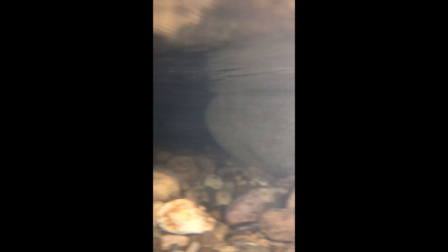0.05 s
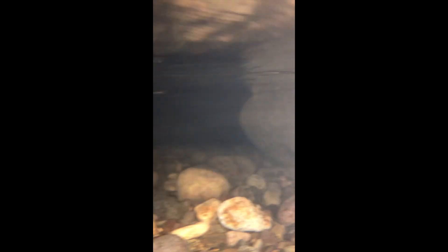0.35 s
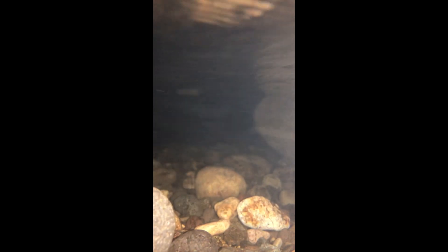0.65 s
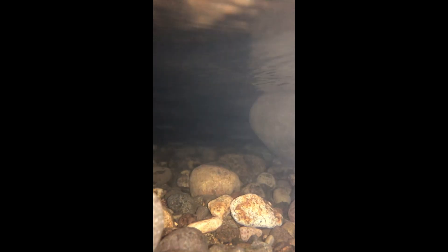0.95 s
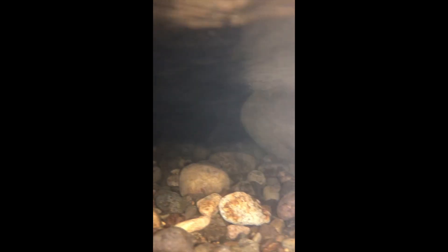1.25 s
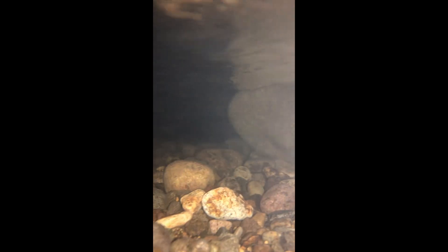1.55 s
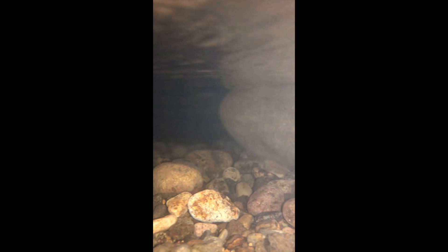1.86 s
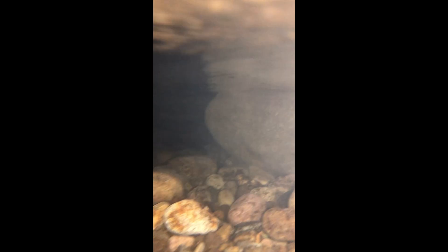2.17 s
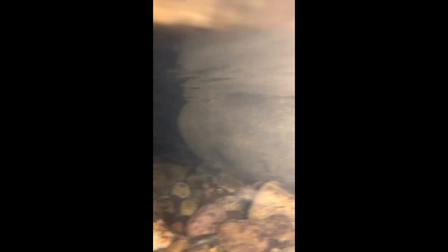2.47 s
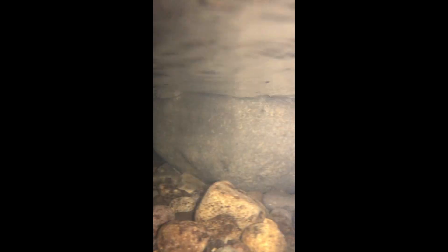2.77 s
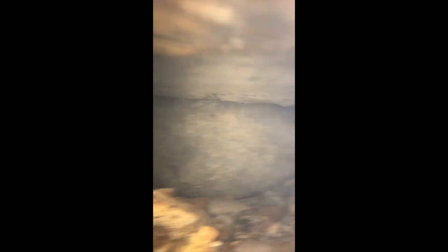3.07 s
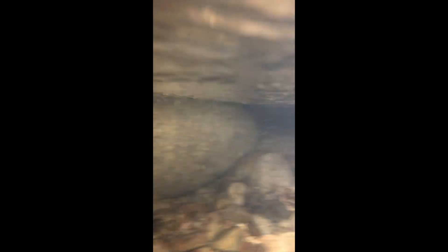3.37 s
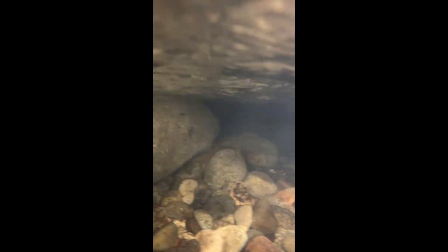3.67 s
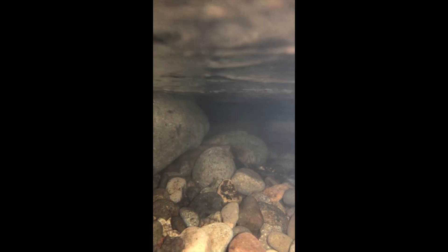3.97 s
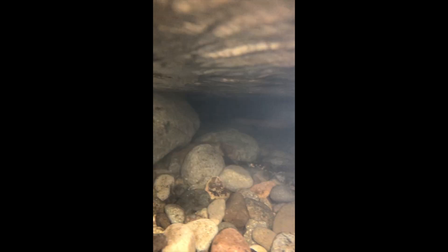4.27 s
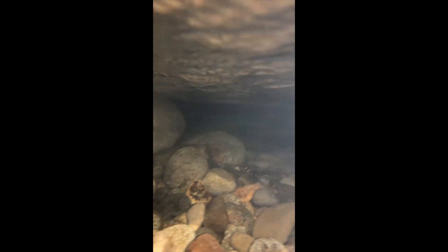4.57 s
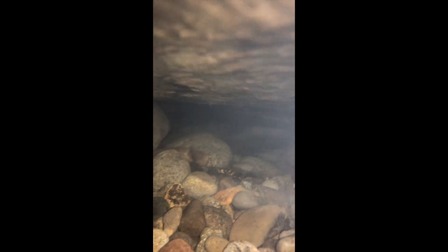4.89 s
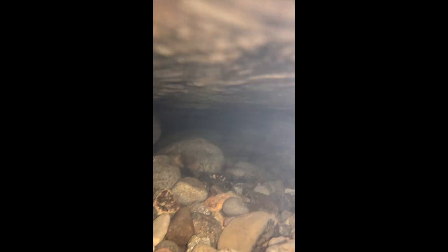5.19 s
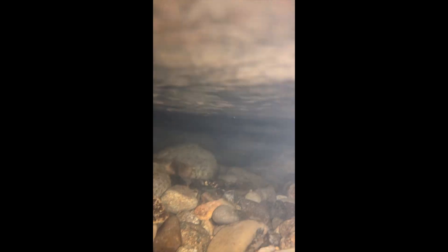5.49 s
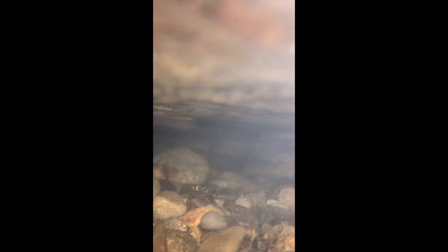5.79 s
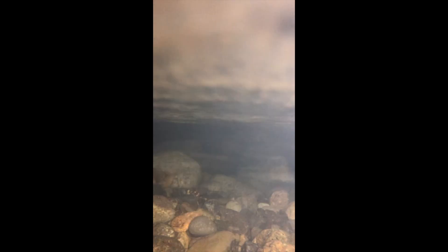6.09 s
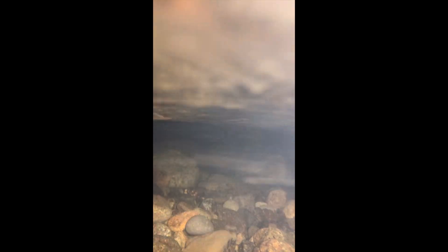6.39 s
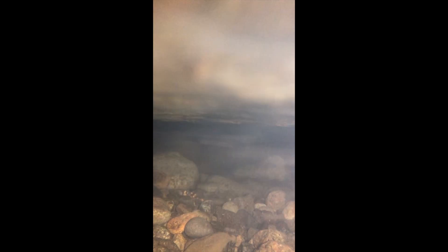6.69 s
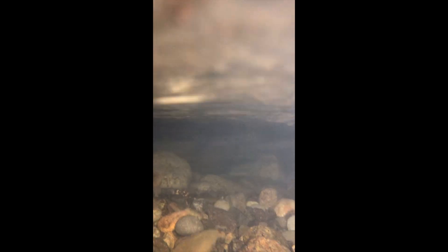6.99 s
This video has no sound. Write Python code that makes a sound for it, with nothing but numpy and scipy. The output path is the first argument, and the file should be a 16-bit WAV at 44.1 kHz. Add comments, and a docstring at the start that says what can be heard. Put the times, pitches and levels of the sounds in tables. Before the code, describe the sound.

Muffled underwater rumble of a shallow stony river, with chirping knocks on the microphone, a few close bubble pings and low buffeting near the end.

```python
"""Chirping knocks and a few close bubble pings, over the rumble of a shallow stony river heard underwater.
The ear is a hand-held waterproof camera: knocks on its case arrive treble first, as short falling chirps.
Countless far bubbles blur into a muffled wash, sand ticks on the case and the water round it rings hollow.
Towards the end eddies buffet the case, a low drone joins the rumble and two short sloshes gurgle past."""
import sys
import numpy as np
from scipy import signal
from scipy.fft import rfft, irfft
from scipy.io import wavfile

SR = 44100
rng = np.random.default_rng(int(sys.argv[2]) if len(sys.argv) > 2 else 0)


def wrap_up_sound(samples):
    """Save the sound to the file named by the first command line argument, as 16-bit audio."""
    columns = np.atleast_2d(samples).T
    # keep every value between -1 and 1, then stretch to whole-number steps
    tamed = np.clip(columns, -1, 1)
    steps = np.round(tamed * 32767).astype(np.int16)
    wavfile.write(sys.argv[1], SR, steps)


N = 319725

# strength of the current along the case: time_s, level_db
CURRENT_LEVEL = [(0, -40), (0.22, -47.5), (0.48, -57.5), (0.72, -46), (0.9, -54), (1.2, -42.5), (1.7, -47),
                 (2.2, -44.5), (2.6, -47), (3.0, -39), (3.25, -47), (4.5, -46), (5.2, -47.5), (5.6, -42),
                 (5.85, -46.5), (6.4, -46.5), (7.0, -43), (7.25, -42.5)]
# bass-heavy tone of the turbulence: frequency_hz, gain_db
RUMBLE_EQ = [(22, -49), (35, -11.5), (55, 1.5), (85, 5), (120, 0.5), (170, -5.5), (240, -17), (400, -21),
             (800, -49.5), (3000, -100)]
# faders for the riffle's bubbles and sand: time_s, wash_db, fizz_db
RIFFLE_LEVELS = [(0, -51.5, -71), (0.25, -52, -70.5), (0.45, -54, -72), (0.8, -51, -72.5), (1.9, -51, -74),
                 (2.4, -53, -70.5), (2.8, -51.5, -73.5), (3.2, -52.5, -71), (3.7, -53.5, -72.5),
                 (4.6, -53, -74.5), (5.5, -53, -73), (6.05, -52, -75), (6.42, -52, -70.5),
                 (6.65, -52, -74.5), (7.25, -51.5, -72.5)]
# muffled tone of the far bubbles: frequency_hz, gain_db
WASH_EQ = [(60, -17.5), (200, 0), (320, -1.5), (520, -0.5), (760, -3.5), (1050, -1), (1350, -7.5),
           (1650, -9.5), (2050, -7.5), (2400, -11.5), (2800, -26.5), (3600, -32.5), (6000, -53),
           (12000, -72)]
# hollow ring of the water round the case, strong at first: time_s, level_db
RING_LEVEL = [(0, -45), (0.2, -47.5), (0.4, -55.5), (1.0, -58), (2.6, -58), (4.8, -55), (7.25, -66.5)]
# bright tone of the sand: frequency_hz, gain_db
FIZZ_EQ = [(1500, -27.5), (2800, -1.5), (3800, -1), (4600, -7.5), (5200, -10), (6000, -16), (7500, -21),
           (12000, -54)]
# knocks on the case: time_s, peak_db, low_edge_hz, top_edge_hz
CASE_KNOCKS = [(0.118, -14, 510, 2570), (0.1269, -15.5, 415, 1590), (0.2272, -17, 535, 3100),
               (0.2393, -24, 500, 2000), (0.2729, -33, 605, 2220), (0.322, -20.5, 614, 2200),
               (0.3447, -22.5, 503, 3270), (0.3489, -17.5, 516, 2370), (0.6613, -35, 560, 1510),
               (0.7678, -37.5, 420, 614), (0.9856, -26.5, 318, 1090), (1.127, -25.5, 80, 540),
               (1.154, -22, 51, 734), (1.1823, -29, 51, 400), (2.072, -26, 69.4, 640),
               (2.1744, -27.5, 96, 600), (2.2699, -34.5, 51, 1400), (2.3632, -39.5, 51, 920),
               (2.526, -34.5, 420, 635), (2.9142, -37, 97, 680), (2.9863, -30, 178, 650),
               (3.0361, -30.5, 322, 680), (3.061, -31.5, 80, 545), (3.467, -16, 79, 420),
               (3.9784, -22, 61.4, 536), (4.199, -23.5, 68.4, 406), (4.4924, -37, 51, 646),
               (4.6843, -39, 750, 1400), (4.9802, -28.5, 119, 584), (5.316, -33.5, 51, 700),
               (5.3912, -26.5, 68, 745), (5.721, -30.5, 100, 720), (5.7564, -23, 68, 613),
               (5.7754, -23.5, 100, 594), (6.019, -36.5, 250, 700), (6.972, -28.5, 117, 840)]
# bubbles close by: pinch_off_s, peak_db, pitch_hz, swell_s, decay_s
NEAR_BUBBLES = [(0.1275, -22, 1114, 0.0007, 0.0038), (0.131, -24, 503, 0.0011, 0.0041),
                (.231, -28.5, 630, 0.00038, .005), (.2445, -19, 820, 0.00085, 0.00022),
                (.247, -5.5, 1507, 0.000076, 0.0032), (0.2725, -26, 1470, 0.00009, 0.0019),
                (0.311, -37, 2544, .003, 0.0096), (0.3184, -31, 2840, .0007, .0011),
                (0.3211, -6, 2130, 0.00037, 0.0017), (0.99, -27.5, 476, 0.0024, 0.0052)]
# single hard shoves of water: centre_s, peak_db, pitch_hz, half_length_s
WATER_SURGES = [(1.014, -34, 60, 0.01), (1.188, -29.5, 83, 0.018), (5.437, -27.5, 55, 0.013),
                (6.053, -24, 119, 0.0076), (6.068, -13, 76, .012), (6.246, -29.5, 75, 0.0078),
                (6.654, -22.5, 97, 0.0078), (6.705, -17, 87, 0.0055), (6.749, -22.5, 85, 0.0072),
                (6.793, -13, 68.4, 0.007)]
# low drone that joins the rumble: time_s, level_db
DRONE_LEVEL = [(0, -74), (5.1, -70.5), (5.5, -55), (6.3, -55), (6.7, -43.5), (7.25, -55)]
# spells of buffeting that swell and die away: centre_s, level_db, pitch_hz, half_length_s
BUFFET_SPELLS = [(5.46, -34, 55, .055), (6.046, -35, 72, 0.089), (6.757, -31.5, 62, 0.14),
                 (7.2, -37.5, 60, 0.085)]
# sloshes against the case: crest_s, level_db, rise_s
SLOSH_SWELLS = [(6.575, -45, 0.056), (7.01, -56, .02)]
# throaty tone of the sloshes: frequency_hz, gain_db
SLOSH_EQ = [(100, -20), (330, 0), (650, -2.5), (1100, -10), (2200, -17), (5000, -59), (12000, -86)]
# thin whine of the electronics: pitch_hz, width_hz, base_level_db
WHINE_TONES = [(4960, 80, -81.5), (9950, 80, -98), (14928, 95, -101.5)]
# fader ride on that whine: time_s, gain_db
WHINE_RIDE = [(0, -3), (3.2, 0.5), (4.6, -3), (5.3, 1.5), (6.45, 2.5), (6.65, -1.5), (7.25, 3)]
# tone of the electronic hiss: frequency_hz, gain_db
HISS_EQ = [(500, 0.5), (6000, -5.5), (9000, 2), (12500, -0.5), (15000, -6)]

CASE_HZ, CASE_Q = 74.6, 1.09  # the case sways on the water round it
KNOCK_LEAD_S = .01  # room ahead of each chirp's attack


def gain_of(db):
    """Decibels to amplitude."""
    return 10 ** (np.asarray(db) / 20)


def unit_rms(x):
    """Scales to an rms of one."""
    return x / np.sqrt(np.mean(x ** 2) + 1e-30)


def fader(rows, column=1):
    """One dB column of a level table as a gain for every sample."""
    rows = np.asarray(rows)
    return gain_of(np.interp(np.arange(N) / SR, rows[:, 0], rows[:, column]))


def swell(crest_s, db, rise_s, fall_s):
    """A bell-shaped fade in and out, as a gain for every sample."""
    t = np.arange(N) / SR - crest_s
    return gain_of(db) * np.exp(-.5 * (t / np.where(t < 0, rise_s, fall_s)) ** 2)


def add(mix, start_s, sound):
    """Drops a sound into the mix."""
    part = mix[max(round(start_s * SR), 0):][:len(sound)]
    part += sound[:len(part)]


def equalised(x, eq):
    """Runs x through an EQ curve, to an rms of one."""
    hz, db = np.transpose(eq)
    f = np.fft.rfftfreq(N, 1 / SR)
    curve = gain_of(np.interp(np.log(f + 1), np.log(hz), db))
    return unit_rms(irfft(rfft(x) * curve, N))


def drift(rate_hz):
    """A slow random wobble with an rms of one."""
    f = np.fft.rfftfreq(N, 1 / SR)
    return unit_rms(irfft(rfft(rng.standard_normal(N)) * np.exp(-(f / rate_hz) ** 2), N))


def resonance(hz, width_hz):
    """Noise ringing in one narrow band, whose pitch may move."""
    f = np.fft.fftfreq(N, 1 / SR)
    noise = rng.standard_normal(N) + 1j * rng.standard_normal(N)
    envelope = np.fft.ifft(noise / (1 + (f / width_hz) ** 2))
    carrier = np.exp(2j * np.pi * np.cumsum(hz * np.ones(N)) / SR)
    return unit_rms((envelope * carrier).real)


def clicks(per_s, spread_db):
    """A random crackle of impulses, a few of them loud."""
    size = gain_of(spread_db * np.minimum(rng.exponential(1, N), 4))
    return size * rng.choice([-1, 1], N) * (rng.random(N) < per_s / SR)


def current_rumble(trim_db=-2, lumpy_db=2.5):
    """Turbulence along the case lays down a lumpy low bed."""
    lumps = gain_of(trim_db + lumpy_db * drift(rate_hz=9))
    return lumps * fader(CURRENT_LEVEL) * equalised(rng.standard_normal(N), RUMBLE_EQ)


def bubble_wash(trim_db=1, grain=0.65, decay_cycles=5, flutter_db=0.48):
    """Countless far bubbles ping in the riffle and blur into noise, muffled by the case."""
    t, pings = np.arange(0, .05, 1 / SR), np.zeros(N)
    for hz in np.geomspace(250, 3000, 20):
        ping = np.exp(-t * hz / decay_cycles) * np.sin(2 * np.pi * hz * t * (1 + 2 * t))
        swarm = signal.oaconvolve(clicks(per_s=110, spread_db=2.6), ping)[:N]
        pings += np.sqrt(hz) * unit_rms(swarm)
    blend = grain * equalised(pings, WASH_EQ) + equalised(rng.standard_normal(N), WASH_EQ)
    flutter = gain_of(trim_db + flutter_db * drift(rate_hz=5.3))
    return flutter * fader(RIFFLE_LEVELS) * unit_rms(blend)


def hollow_ring(pitch_hz=1034, wander_hz=22, waver_db=0.5):
    """The flow keeps the water round the case ringing on a wandering midrange note."""
    ring = resonance(pitch_hz + wander_hz * drift(rate_hz=1.5), width_hz=113)
    return gain_of(waver_db * drift(rate_hz=7)) * fader(RING_LEVEL) * ring


def sand_fizz(trim_db=1, grain=.6, flutter_db=.6, spurt_mix=0.77, spurt_decay_s=0.0055):
    """Sand grains tick faintly against the case, some in small spurts."""
    tail = np.exp(-np.arange(0, .03, 1 / SR) / spurt_decay_s)
    bursts = signal.oaconvolve(abs(clicks(per_s=41, spread_db=0.9)), tail)[:N]
    spurts = spurt_mix * unit_rms(bursts * rng.standard_normal(N))
    ticks = grain * unit_rms(clicks(per_s=610, spread_db=6.0))
    blend = ticks + spurts + rng.standard_normal(N)
    flutter = gain_of(trim_db + flutter_db * drift(rate_hz=40))
    return flutter * fader(RIFFLE_LEVELS, column=2) * equalised(blend, FIZZ_EQ)


def chirp(low_hz, top_hz, lag_cycles=1.196, tilt=0.98, thump=0.088, size=4096):
    """A dispersed knock: each frequency lands about a cycle late; the case's sway delays the bass more."""
    f = np.fft.rfftfreq(size, 1 / SR) + 1e-3
    body = 1 / np.sqrt(1 + (low_hz / f) ** 6)
    push = thump / np.sqrt(1 + (CASE_HZ / f) ** 6)  # even a hard click nudges the whole case
    tone = (body + push) / f ** tilt * np.exp(-(f / top_hz) ** 5)
    lag_turns = lag_cycles * np.log((f + 3) / (f + 5000)) + f * KNOCK_LEAD_S
    sway = np.exp(-2j * np.arctan2(f * CASE_HZ / CASE_Q, CASE_HZ ** 2 - f ** 2))
    wave = irfft(tone * sway * np.exp(-2j * np.pi * lag_turns))
    peak = abs(signal.hilbert(wave)).max()
    return wave * signal.windows.tukey(size, .15) / peak


def patter(trim_db=-10):
    """Slight, dull bumps on the case, louder when the current is strong."""
    bumps = np.zeros(N)
    for top_hz in (280, 420, 650):
        bumps += signal.oaconvolve(clicks(per_s=14, spread_db=2.0), chirp(top_hz / 4, top_hz))[:N]
    return gain_of(trim_db) * fader(CURRENT_LEVEL) * unit_rms(bumps)


def knocks():
    """Single hits on the case: hard ones click, soft ones plop."""
    out = np.zeros(N)
    for time_s, db, low_hz, top_hz in CASE_KNOCKS:
        add(out, time_s - KNOCK_LEAD_S, gain_of(db) * chirp(low_hz, top_hz))
    return out


def near_bubbles(glide=0.015, tick_hz=8700, tick_db=-27.5, tick_width_s=0.000245, snap_s=.00009,
                 coder_hiss_db=-66, coder_hiss_decay_s=0.03):
    """Each bubble swells, pinches off with a tick and rings down, its pitch creeping sharp."""
    out, lead_s = np.zeros(N), .02
    t = np.arange(-lead_s, 2 * lead_s, 1 / SR)
    for pinch_off_s, db, hz, swell_s, decay_s in NEAR_BUBBLES:
        envelope = np.exp(-np.where(t < 0, -t / swell_s, t / decay_s))
        ping = envelope * np.sin(2 * np.pi * hz * t * (1 + glide * t / lead_s))
        tick = np.exp(-(t / tick_width_s) ** 2) * np.sin(2 * np.pi * tick_hz * t)
        tick_gain = gain_of(tick_db) * np.exp(-swell_s / snap_s)  # slow swellers barely tick
        add(out, pinch_off_s - lead_s, gain_of(db) * (ping + tick_gain * tick))
        # a faint, brief hiss like audio-coder noise follows each ping
        hiss = np.exp(-(t + lead_s) / coder_hiss_decay_s) * rng.standard_normal(len(t))
        add(out, pinch_off_s, gain_of(db + coder_hiss_db) * hiss)
    return out


def surges():
    """Low thuds: eddies shove the case to and fro for a cycle or two."""
    out, lead_s = np.zeros(N), .07
    t = np.arange(-lead_s, lead_s, 1 / SR)
    for centre_s, db, hz, half_s in WATER_SURGES:
        thud = np.exp(-.5 * (t / half_s) ** 2) * np.cos(2 * np.pi * hz * t)
        add(out, centre_s - lead_s, gain_of(db) * thud)
    return out


def low_drone():
    """The flow keeps a narrow bass resonance humming; it comes up late in the scene."""
    return fader(DRONE_LEVEL) * resonance(hz=148, width_hz=9.8)


def buffets(low_cut_hz=36, lumpy_db=2.5):
    """Runs of smaller eddies shake the case in lumps for a while."""
    lumps = gain_of(lumpy_db * drift(rate_hz=20))
    shake = sum(swell(centre_s, db, half_s, half_s) * resonance(hz, width_hz=26)
                for centre_s, db, hz, half_s in BUFFET_SPELLS)
    low_cut = signal.butter(5, low_cut_hz, "high", fs=SR, output="sos")
    return signal.sosfilt(low_cut, lumps * shake + 1e-12)


def sloshes():
    """Water builds against the case and breaks off: a short gurgle of tightly packed bumps."""
    envelope = sum(swell(crest_s, db, rise_s, fall_s=0.013) for crest_s, db, rise_s in SLOSH_SWELLS)
    return envelope * equalised(clicks(per_s=700, spread_db=3), SLOSH_EQ)


def scene():
    """The river's steady bed with the hits on top, in mono."""
    bed = current_rumble() + bubble_wash() + hollow_ring() + low_drone() + sand_fizz() + patter()
    return (bed + buffets() + sloshes() + surges() + knocks() + near_bubbles())[None]


def record(dry, hiss_db=-85, high_cut_hz=15600):
    """The camera's electronics add a thin whine and hiss, then shave off the very top."""
    tones = sum(gain_of(db) * resonance(hz, width_hz) for hz, width_hz, db in WHINE_TONES)
    whine = fader(WHINE_RIDE) * tones
    hiss = gain_of(hiss_db) * equalised(rng.standard_normal(N), HISS_EQ)
    high_cut = signal.firwin(511, high_cut_hz, window=("kaiser", 9), fs=SR)
    return signal.oaconvolve(dry + whine + hiss, high_cut[None], "same")


dry = scene()
out = record(dry)
wrap_up_sound(out)
```